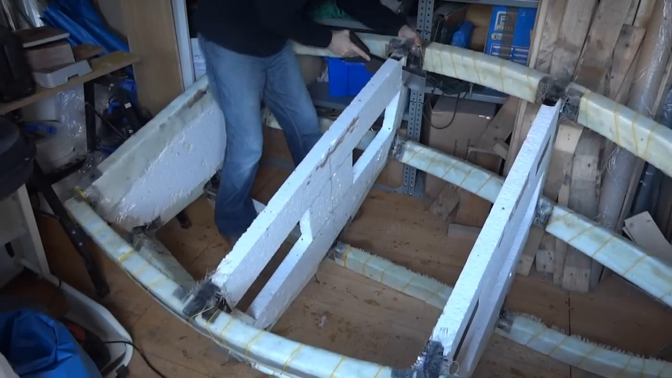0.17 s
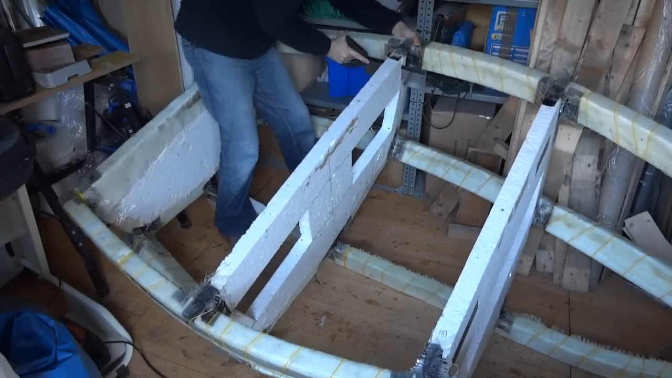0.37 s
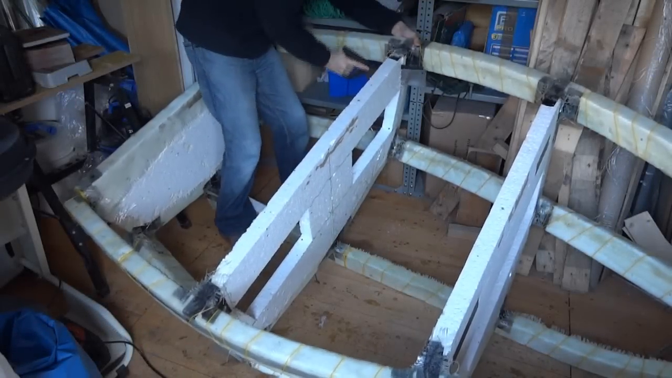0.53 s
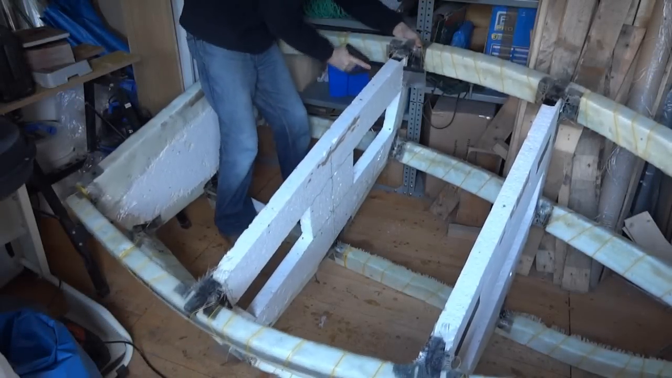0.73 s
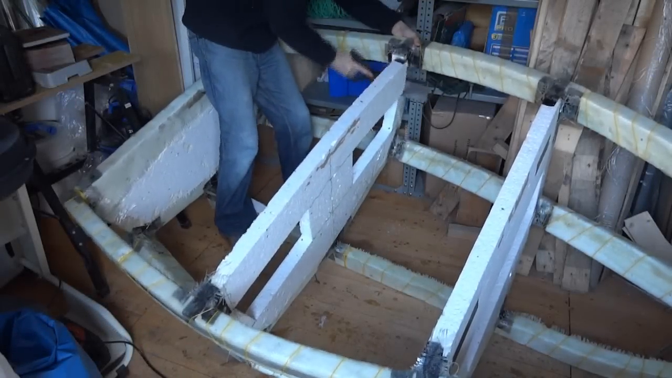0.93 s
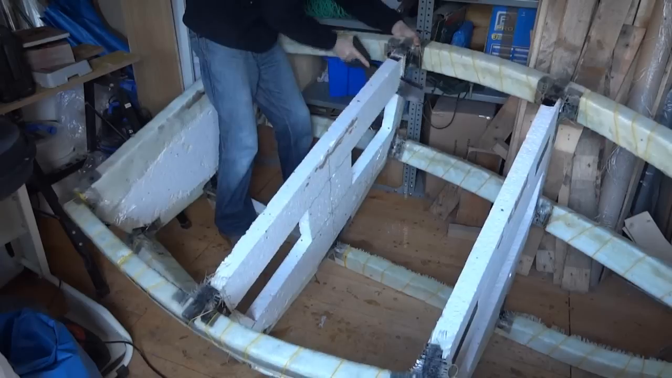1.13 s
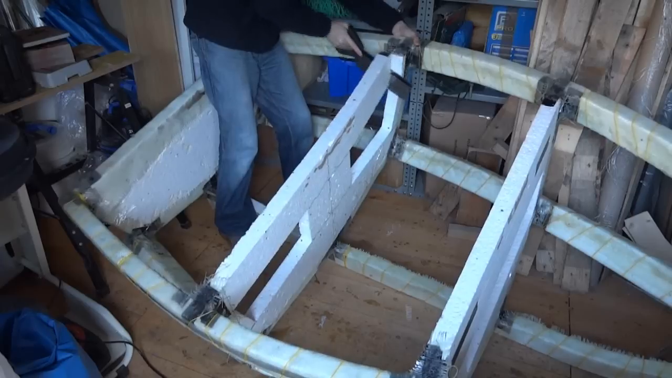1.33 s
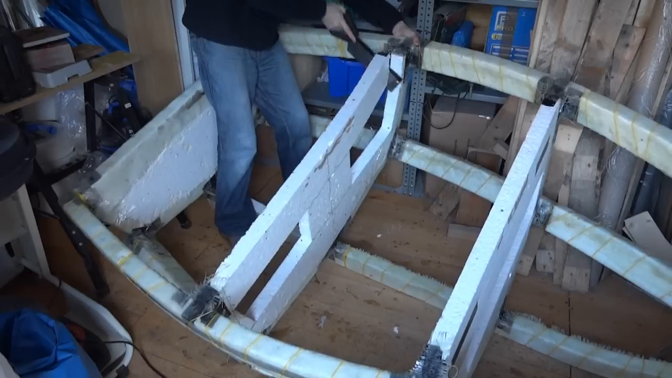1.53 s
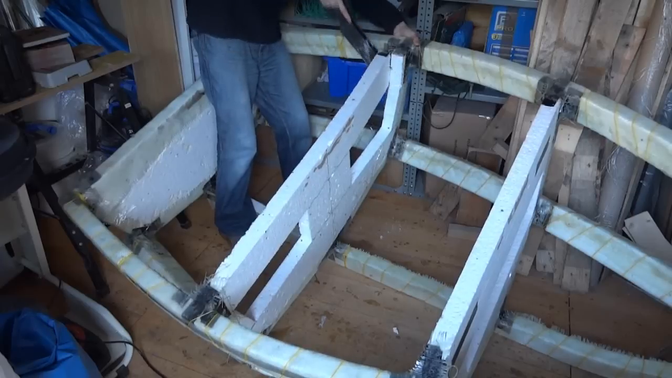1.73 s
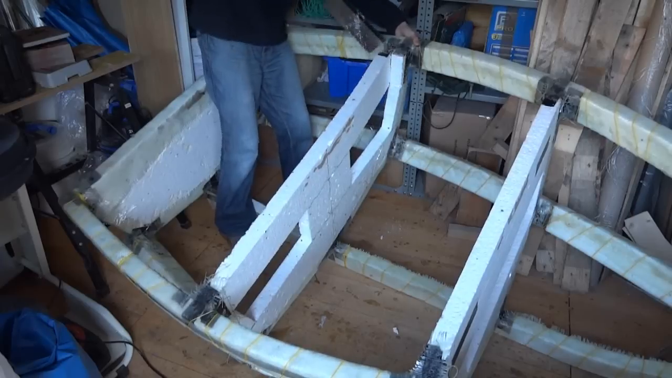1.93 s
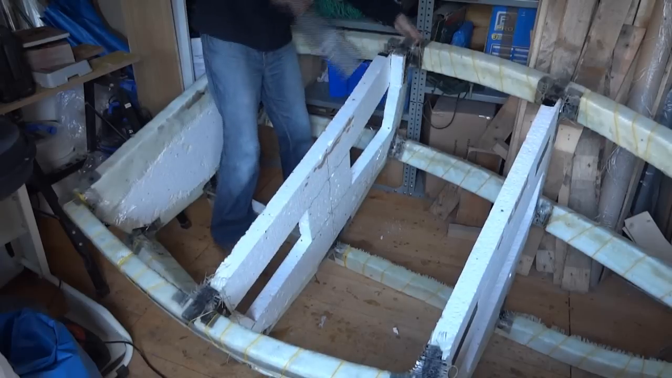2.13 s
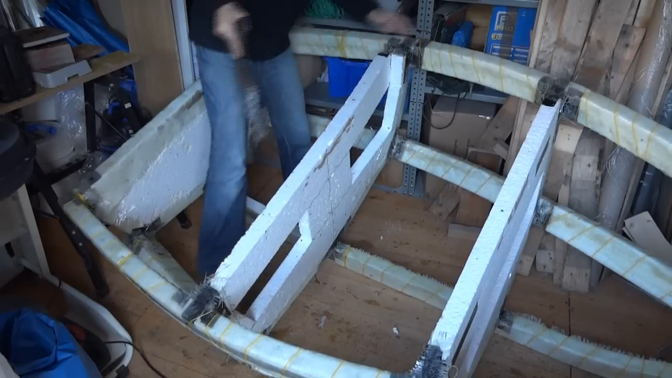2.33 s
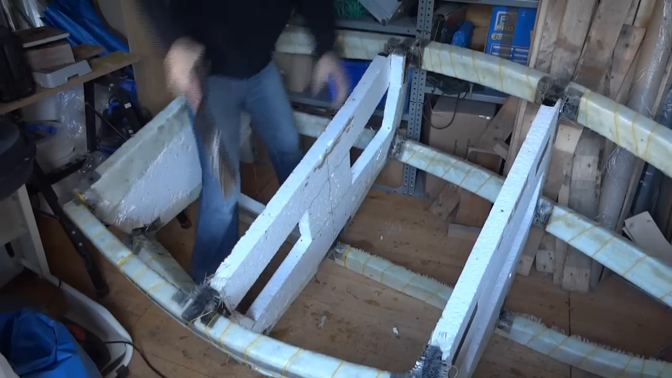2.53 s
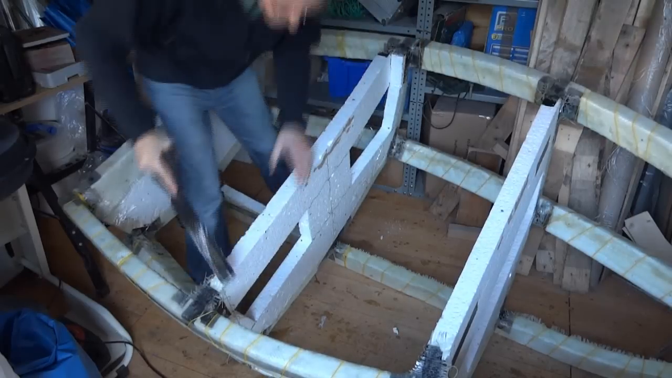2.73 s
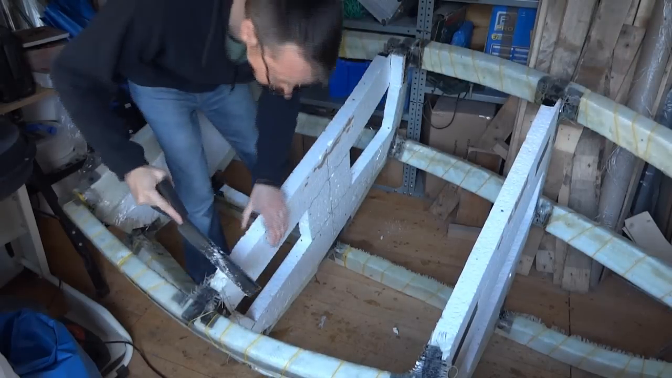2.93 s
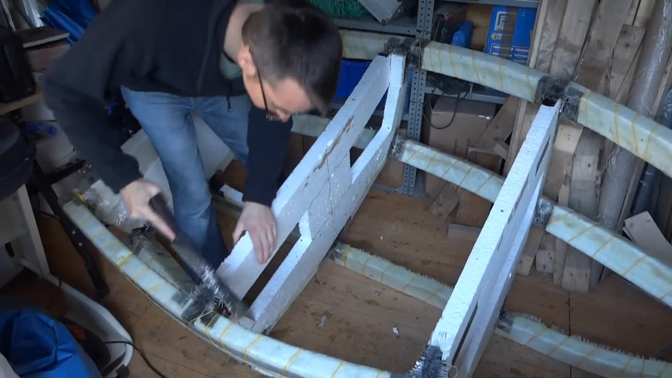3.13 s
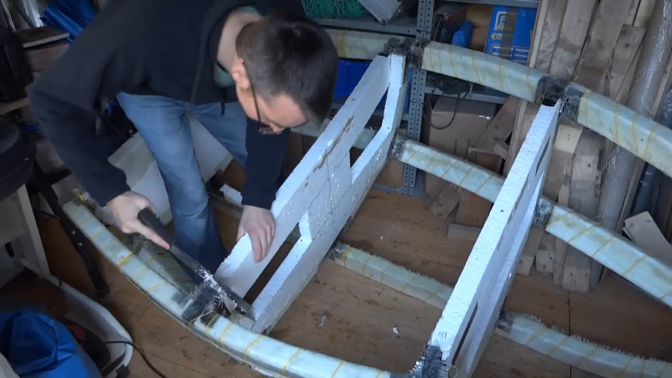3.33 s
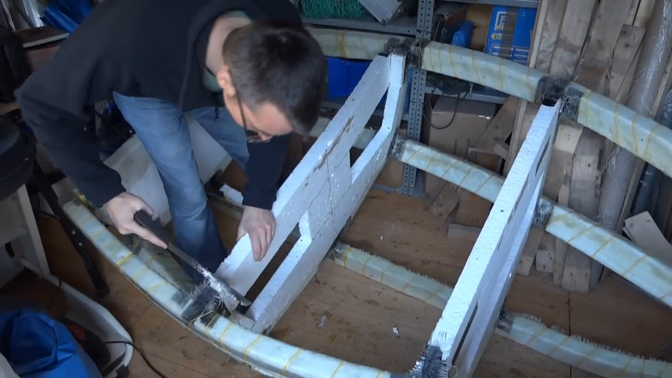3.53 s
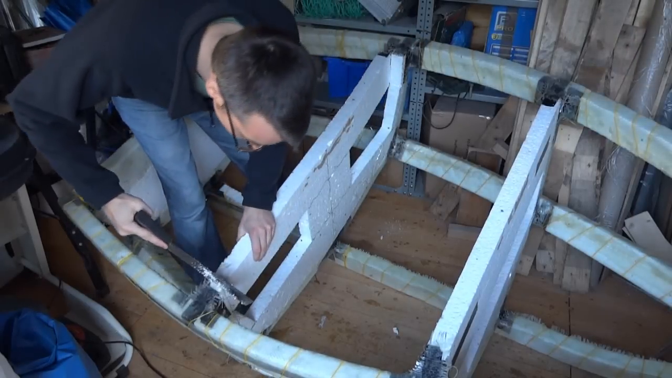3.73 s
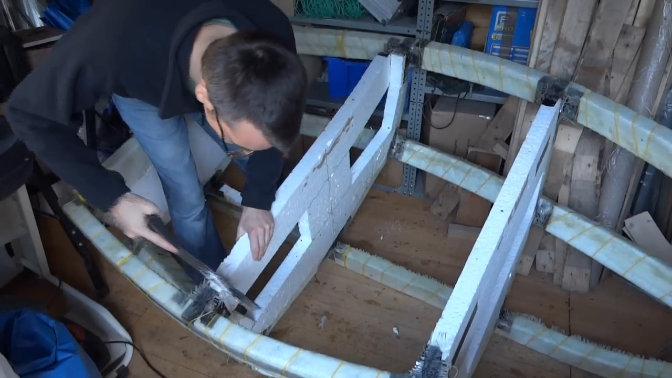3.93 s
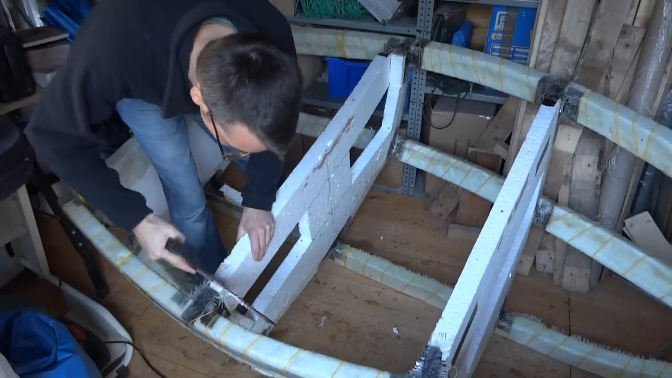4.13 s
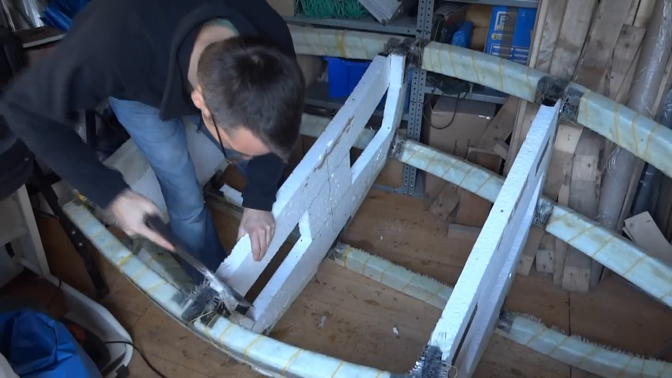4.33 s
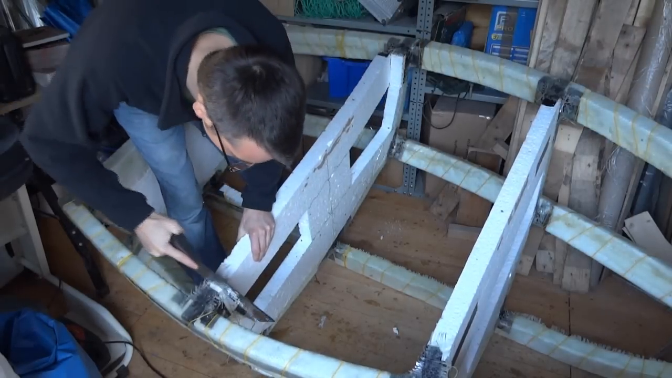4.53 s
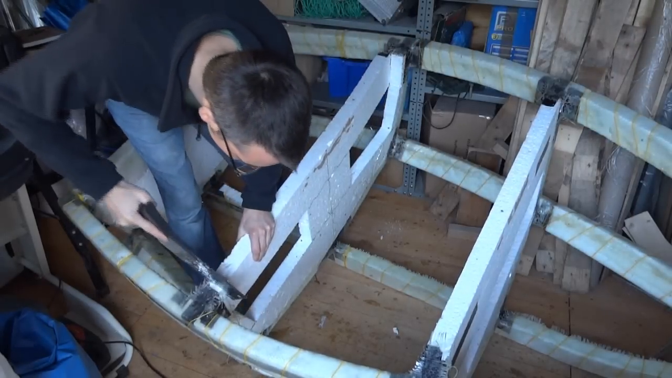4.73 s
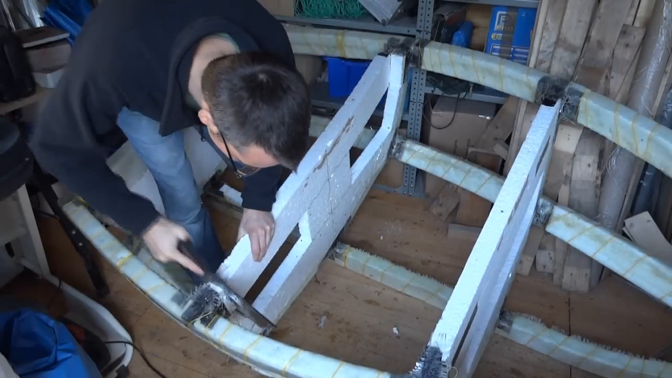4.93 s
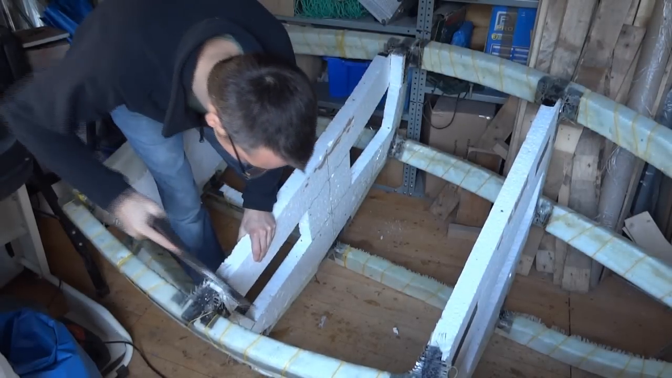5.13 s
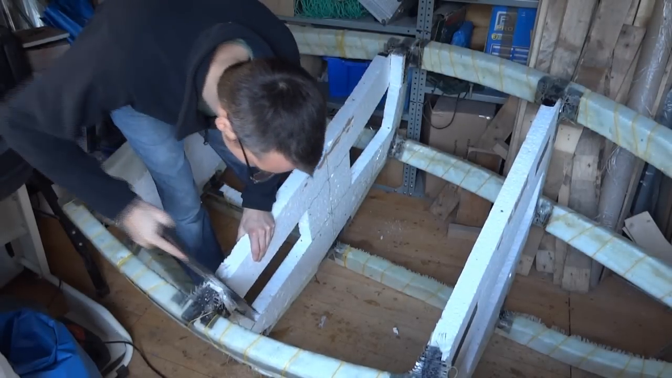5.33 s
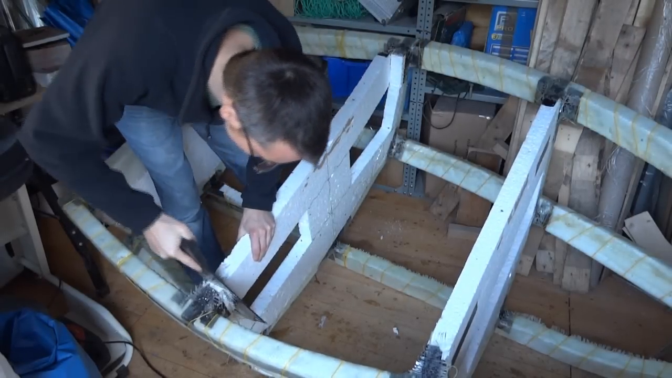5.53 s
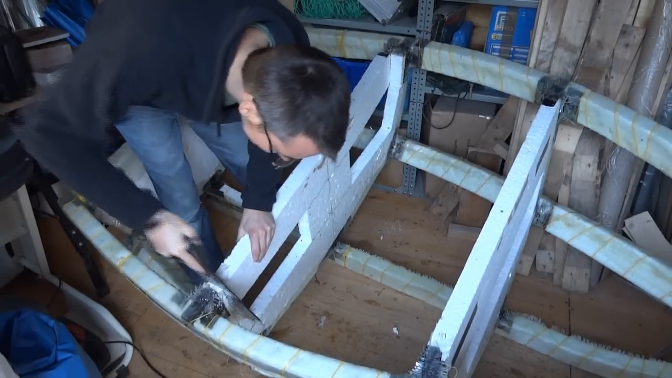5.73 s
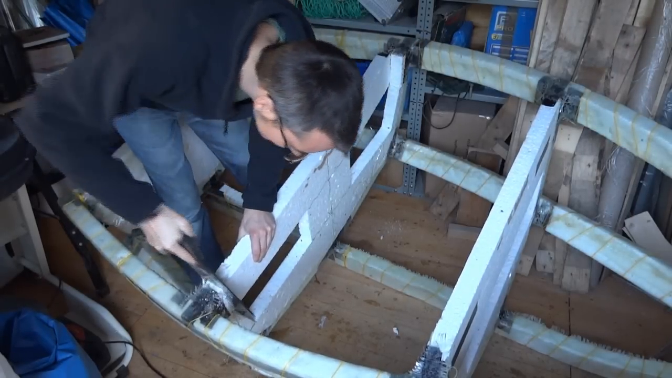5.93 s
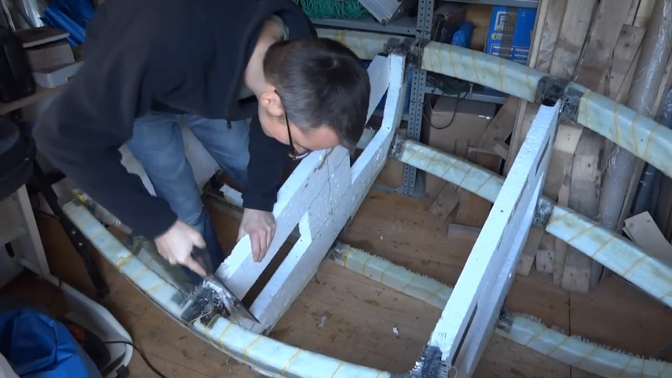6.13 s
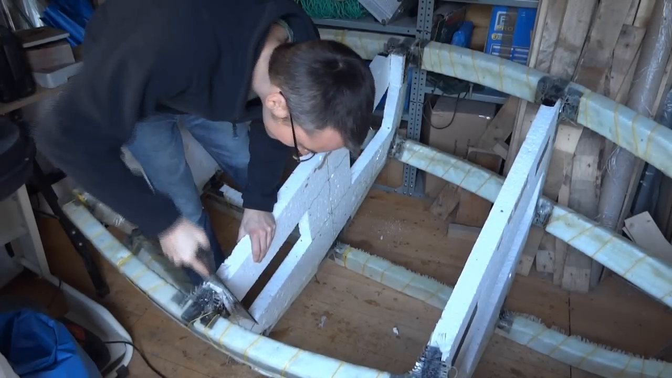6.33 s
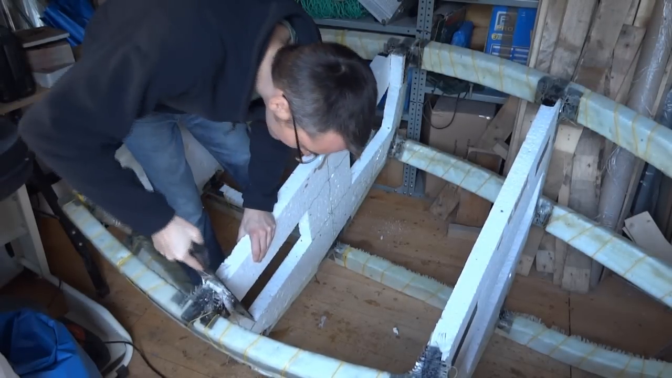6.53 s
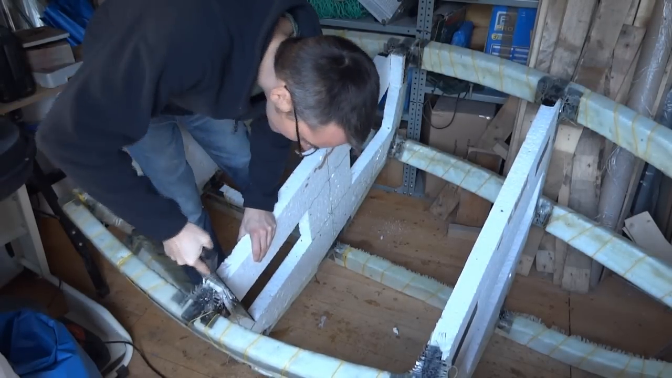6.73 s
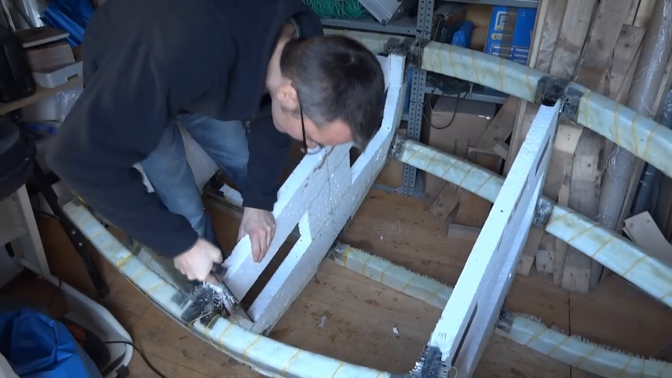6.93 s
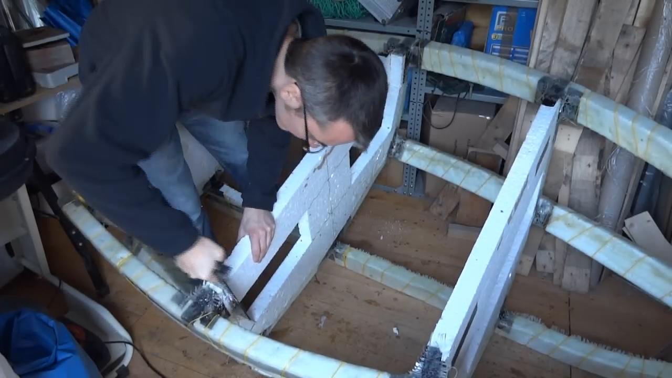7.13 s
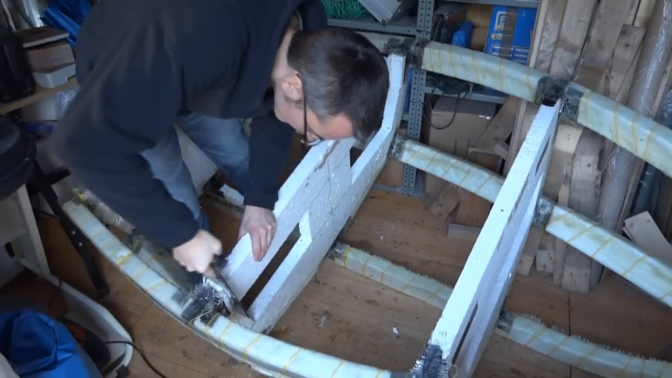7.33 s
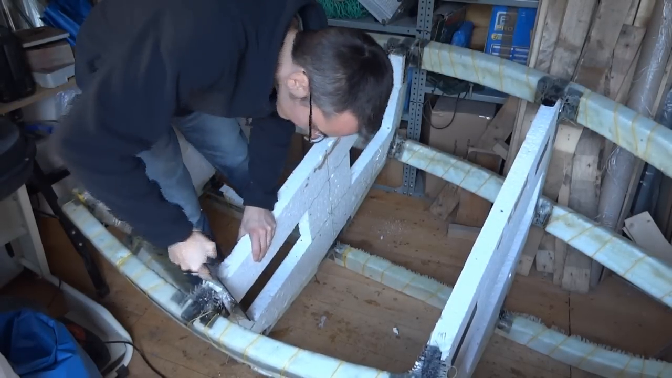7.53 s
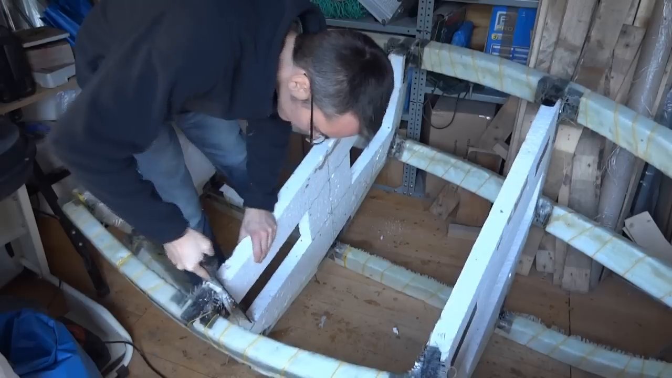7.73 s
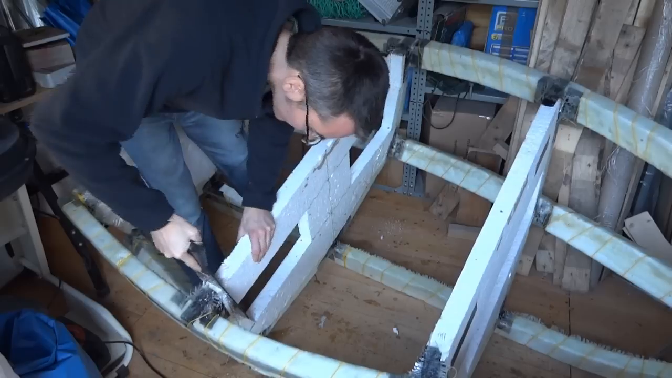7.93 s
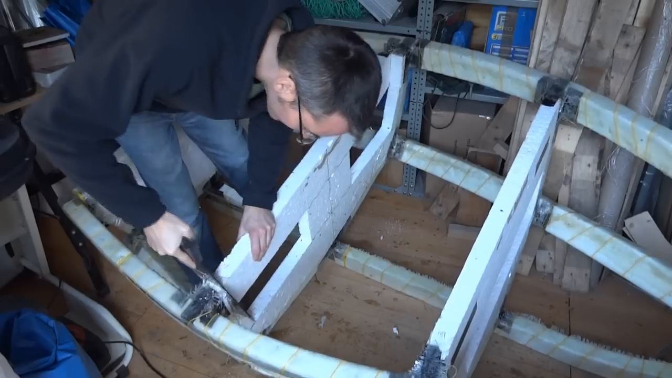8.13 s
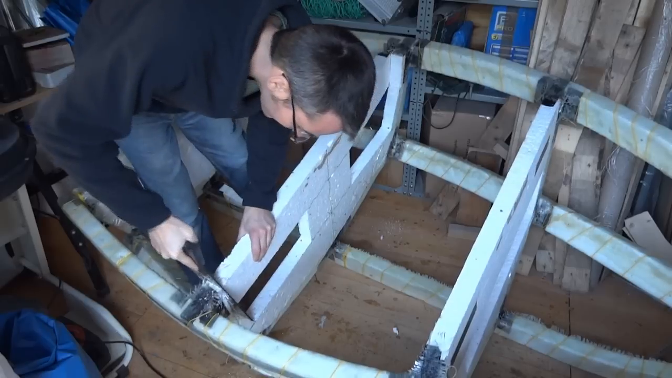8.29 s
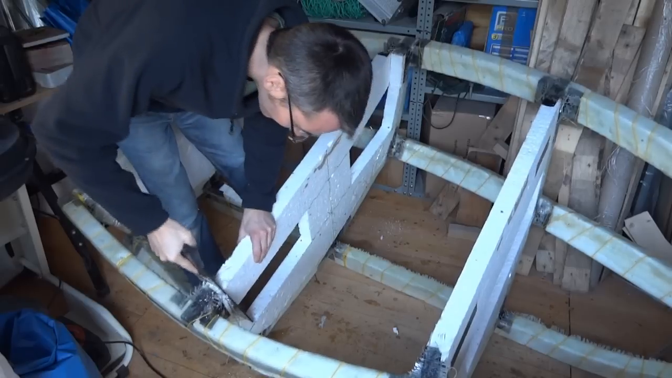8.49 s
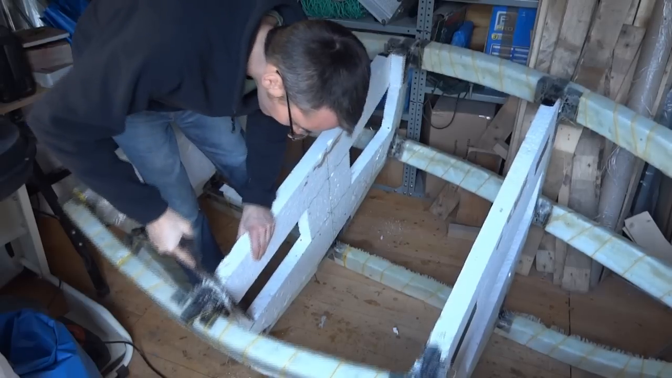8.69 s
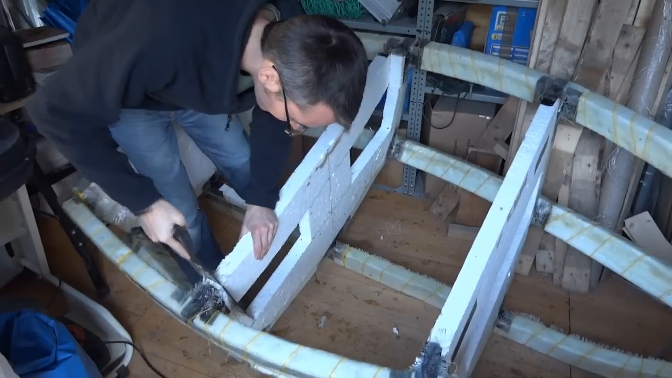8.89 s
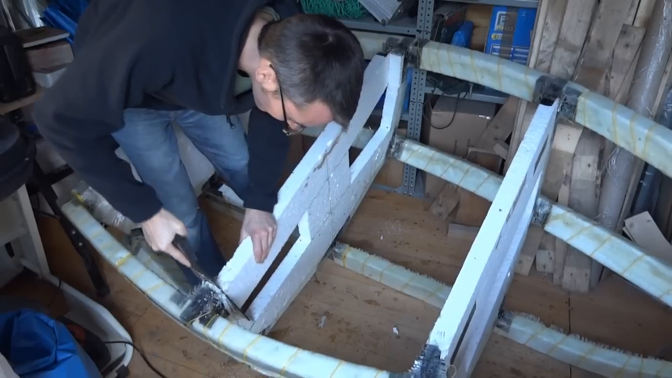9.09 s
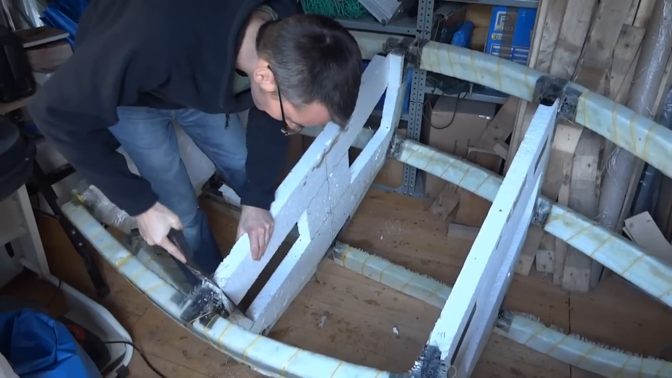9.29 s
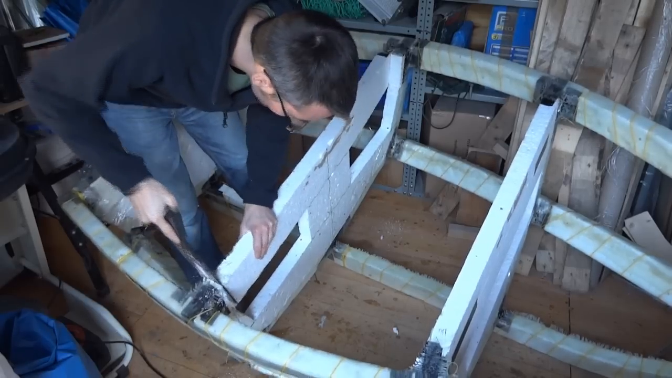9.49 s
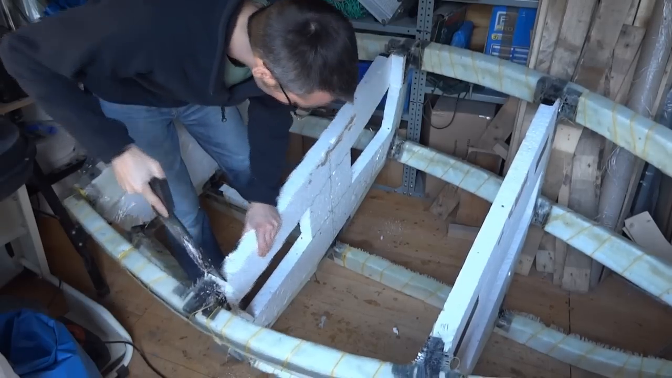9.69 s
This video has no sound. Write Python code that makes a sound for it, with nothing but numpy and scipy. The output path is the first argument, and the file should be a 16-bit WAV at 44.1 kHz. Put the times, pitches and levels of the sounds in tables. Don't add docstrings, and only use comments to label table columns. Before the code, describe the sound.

A close, nearly mono perspective in a small dry workshop with very quiet air. From 0 to 1.8 s a hand saw cuts polystyrene foam: soft hesitant rasps at first, then from 0.4 s loud, dense, bright crackle of tearing beads in uneven strokes. At about 1.6 to 1.8 s the blade draws out with a rough high squeal around 5 to 6 kHz, the low body thinning away. From 1.9 to 3.9 s it is almost quiet: a small dry tick, two dull steps near 2.0 and 2.45, cloth rustle, a brush at 2.8, then light steel chatters on foam at 3.5 to 3.9. At 3.97 sawing resumes, irregular until 5.8, then steady rapid push-pull rasps, about seven per second, alternately fuller and fizzier, with brief squeaks, chirps and hollow panel drumming. Strokes weaken after 9.45 s but continue to the end.

```python
import sys
import numpy as np
from scipy import signal
from scipy.fft import rfft, irfft, next_fast_len
from scipy.io import wavfile
from scipy.ndimage import uniform_filter1d

SR = 44100
rng = np.random.default_rng(int(sys.argv[2]) if len(sys.argv) > 2 else 0)


def level_to_linear(level):
    exponent = np.asarray(level, float) / 20
    return 10 ** exponent


def master_out(mix):
    frames = np.transpose(np.atleast_2d(mix))
    ceiling = np.clip(frames, -1, 1)
    pcm = np.round(ceiling * 32767).astype(np.int16)
    wavfile.write(sys.argv[1], SR, pcm)


N = 429975
PADDED = next_fast_len(N)


def rms_one(x):
    return x / np.sqrt(np.mean(x ** 2) + 1e-20)


def bins_hz():
    return np.fft.rfftfreq(PADDED, 1 / SR)


def at_hz(points, hz):
    point_hz, point_db = np.transpose(points)
    return np.interp(np.log(hz), np.log(point_hz), point_db)


def shaped(x, spectrum):
    gain = level_to_linear(at_hz(spectrum, np.maximum(bins_hz(), 10)))
    return irfft(rfft(x, PADDED) * gain, PADDED)[..., :N]


def drift(hz, size=N):
    r = np.exp(-8 * np.pi * hz / SR)
    white = rng.standard_normal(size // 4 + 1002)
    slow = signal.lfilter([1], [1, -2 * r, r * r], white)[1000:]
    return np.interp(np.arange(size) / 4, np.arange(len(slow)), rms_one(slow))


def resonance(x, hz, width_hz):
    r = np.exp(-np.pi * width_hz / SR)
    feedback = [1, -2 * r * np.cos(2 * np.pi * hz / SR), r * r]
    return signal.lfilter(np.array([1, 0, -1]) * (1 - r * r) / 2, feedback, x)


def slip_tone(hz, unsteady_hz, octave_db):
    phase = 2 * np.pi * np.cumsum(hz) / SR
    wander = .85 + drift(unsteady_hz, size=len(hz)) + 1j * drift(unsteady_hz, size=len(hz))
    swing = wander * np.exp(1j * phase)
    octave = swing ** 2 / (np.abs(swing) + 0.11)
    return rms_one(swing.real + level_to_linear(octave_db) * octave.real)


def air():
    # hz, level_db
    air_spectrum = [(15, -40), (25, -12), (92, 5), (236, -4), (863, -10.5), (936, -14), (3250, -38),
                    (4610, -30.5), (10700, -36.5), (16000, -32.5)]
    return level_to_linear(-54.5) * rms_one(shaped(rng.standard_normal((2, N)), air_spectrum))


def whine():
    return level_to_linear(-76) * rms_one(resonance(rng.standard_normal(N), hz=4600, width_hz=65))


def contact():
    # catch_s, rise_s, hold_s, level_db, weight_db
    far_cut = [(-.04, 0.038, 0.045, -26, 1.5), (.09, 0.009, 0.0058, -30, 5.5),
               (.138, 0.0053, 0.0073, -30.5, 5), (.21, .02, 0.099, -44.5, 2),
               (.311, 0.0083, 0.031, -19.5, 4), (.363, 0.095, 0.18, -15.5, 3),
               (.687, 0.019, 0.032, -25, 2.5), (.782, 0.056, 0.21, -13.5, -2),
               (1.091, 0.034, 0.18, -14, 0.5), (1.321, 0.025, 0.074, -16, 0.5),
               (1.42, 0.031, 0.14, -14, 0.5), (1.57, 0.029, 0.06, -17.5, 2.5),
               (1.676, 0.02, 0.11, -26.5, 3)]
    # start_s, rise_s, hold_s, level_db, weight_db
    steps = [(2.006, 0.0022, 0.025, -48, -3.5), (2.04, .01, 0.025, -56.5, 6),
             (2.152, 0.0071, 0.077, -63, -17), (3.28, .01, .02, -53, -6), (2.438, 0.011, 0.051, -46.5, 8),
             (2.483, 0.008, 0.1, -45.5, 7.5), (2.949, 0.027, 0.021, -56, 3), (3.2, 0.0034, 0.044, -51, -2),
             (3.325, 0.0039, .004, -49, -5), (3.347, 0.0018, 0.027, -48, -4.5)]
    # start_s, rise_s, hold_s, level_db, weight_db
    brushes = [(1.904, .002, 0.0107, -50, -10), (1.975, .015, .01, -56, -5), (2.765, 0.056, 0.025, -36, 3),
               (3.516, 0.0026, 0.018, -40, 2), (3.597, 0.0024, 0.021, -35, 8.5),
               (3.787, 0.0028, 0.0085, -33.5, -4), (3.869, .004, .02, -35.5, 6),
               (3.885, .003, .012, -38.5, -11), (3.91, .005, 0.022, -39.5, -10)]
    # catch_s, rise_s, hold_s, level_db, weight_db
    opening = [(3.969, 0.0036, 0.18, -14.5, 2), (4.264, 0.0015, 0.024, -20.5, 12.5),
               (4.311, 0.03, 0.056, -15, 6), (4.422, 0.023, 0.15, -14.5, 4.5),
               (4.635, 0.021, 0.038, -15.5, -8), (4.73, 0.011, 0.053, -19, -9.5),
               (4.84, 0.0017, 0.15, -16, 3), (5.05, 0.025, 0.011, -17.5, -2),
               (5.103, 0.0033, 0.031, -17.5, 0.5), (5.222, 0.01, .008, -21, -7),
               (5.296, 0.0022, 0.023, -21.5, -4), (5.359, 0.044, 0.076, -16, -2),
               (5.553, 0.035, 0.026, -20.5, -1.5), (5.632, 0.00095, 0.01, -15.5, 5.5),
               (5.72, 0.013, 0.028, -25.5, -5.5), (5.76, 0.0013, 0.074, -15.5, -1)]
    # catch_s, rise_s, hold_s, level_db, weight_db
    pushes = [(6.05, 0.035, 0.055, -15.5, 2.5), (6.349, 0.025, 0.034, -14, 0),
              (6.608, 0.01, 0.013, -21.5, 2), (6.645, 0.01, 0.024, -13.5, -2.5),
              (6.88, 0.062, 0.033, -16, -3.5), (7.18, 0.033, 0.026, -15, -5),
              (7.444, 0.028, 0.082, -15.5, -0.5), (7.717, 0.0014, 0.057, -15, 1),
              (7.954, 0.027, 0.073, -15, 2), (8.21, 0.024, 0.065, -15, 1),
              (8.453, 0.026, 0.081, -15.5, 4.5), (8.725, 0.0014, 0.088, -16, 3.5),
              (9.021, 0.011, 0.088, -15.5, 4), (9.3, 0.024, 0.025, -19, -0.5), (9.5, 0.022, 0.1, -21, -6)]
    # catch_s, rise_s, hold_s, level_db, weight_db
    pulls = [(5.875, 0.056, 0.072, -17, 1.5), (6.175, 0.067, 0.027, -14, -0.5),
             (6.466, 0.026, 0.082, -17, 1.5), (6.745, 0.024, 0.086, -16, 3.5),
             (7.044, 0.016, 0.042, -13, -3), (7.302, 0.0013, 0.021, -14.5, 5),
             (7.365, 0.011, 0.031, -17, 6), (7.536, 0.053, 0.079, -18, 3.5),
             (7.816, 0.029, 0.057, -16.5, 3.5), (8.098, 0.022, 0.036, -16, 8),
             (8.333, 0.016, 0.062, -15.5, 1), (8.604, 0.019, 0.031, -16, 5), (8.882, .004, 0.088, -15.5, 8),
             (9.158, 0.017, 0.074, -16, 3.5), (9.416, 0.002, .012, -21, 2), (9.425, 0.014, 0.021, -12, 0.5),
             (9.644, 0.05, 0.098, -22.5, 2.5)]
    kinds = [
        (far_cut, dict(rise_db=14, swell_db=2, release_db_per_s=271.5,
                       drum_db=-8, body_db=-4, fizz_db=4.5, brighten_db=1.4)),
        (steps, dict(rise_db=20.5, swell_db=-10, release_db_per_s=126,
                     drum_db=13, body_db=9, fizz_db=4.5, brighten_db=-2)),
        (brushes, dict(rise_db=16.5, swell_db=-3.5, release_db_per_s=284,
                       drum_db=14, body_db=10, fizz_db=-1.5, brighten_db=-3)),
        (opening, dict(rise_db=12.5, swell_db=1.1, release_db_per_s=240,
                       drum_db=-7.5, body_db=3, fizz_db=-0.5, brighten_db=2)),
        (pushes, dict(rise_db=14.5, swell_db=0.5, release_db_per_s=227,
                      drum_db=-4, body_db=0.9, fizz_db=1.4, brighten_db=-3.5)),
        (pulls, dict(rise_db=18.5, swell_db=4, release_db_per_s=217,
                     drum_db=-9, body_db=-1, fizz_db=7, brighten_db=-0.5))]
    drum_per_weight, body_per_weight, fizz_per_weight = 0.54, 0.53, -0.92
    body_per_brighten, fizz_per_lack = -0.3, -0.046
    s = np.arange(0, N / SR, 1e-3)
    power = np.full(len(s), level_to_linear(2 * -62.5))
    drum, body, fizz = power * 16, power * 8, power * -4.5
    for rows, way in kinds:
        for catch_s, rise_s, hold_s, level_db, weight_db in rows:
            rise_s, hold_s = max(rise_s, 1e-3), max(hold_s, 1e-3)
            full_s = catch_s + rise_s
            through = np.clip((s - full_s) / hold_s, 0, 1) - .5
            lack_db = way["rise_db"] * np.maximum(full_s - s, 0) / rise_s
            lack_db = lack_db + way["release_db_per_s"] * np.maximum(s - full_s - hold_s, 0)
            stroke = level_to_linear(2 * (level_db + way["swell_db"] * through - np.minimum(lack_db, 200)))
            brighten_db = way["brighten_db"] * through
            power += stroke
            drum += stroke * (way["drum_db"] + drum_per_weight * weight_db)
            body += stroke * (way["body_db"] + body_per_weight * weight_db + body_per_brighten * brighten_db)
            fizz += stroke * (way["fizz_db"] + fizz_per_weight * weight_db + brighten_db
                              + fizz_per_lack * np.minimum(lack_db, 20))
    return s, np.sqrt(power), drum / power, body / power, fizz / power


def chirrups(teeth):
    out = np.zeros(N)
    for hz in np.geomspace(640, 12000, 20):
        flare = np.maximum(drift(22) - .8, 0)
        out += flare * resonance(teeth, hz, 50 + .02 * hz)
    return out


def flexing(x):
    _, _, z = signal.stft(x, nperseg=512)
    field = uniform_filter1d(rng.standard_normal(z.shape), size=5, axis=0)
    field = uniform_filter1d(field, size=4, axis=1)
    mottle_db = 1.8 * rms_one(field)
    return signal.istft(z * level_to_linear(mottle_db), nperseg=512)[1][:N]


def tearing():
    # hz, db_per_hz
    tear_spectrum = [(18, -51), (30, -17.5), (117, -12), (148, -5.5), (231, -2), (469, -5), (793, -3.5),
                     (928, -3), (4020, -1), (4580, -2.5), (13400, -5.5), (15700, -11.5)]
    # hz, width_hz, level_db
    panel_modes = [(153.5, 12, 4), (230, 30, 3), (352, 63, 2), (580, 30, 1.5), (800, 25, -1),
                   (1993, 120, -9.5)]
    # time_s, level_db
    frame_rumble = [(.7, -2), (.9, -3), (1.4, 17), (1.5, 0), (3.5, 9), (7.4, 7), (7.5, 15)]
    # time_s, lowest_hz
    draw_out = [(1.4, 201), (1.412, 1500), (1.46, 2500), (1.575, 3100), (1.6, 4300), (1.655, 4820),
                (1.677, 350), (1.698, 5000), (1.795, 5620), (1.81, 200)]
    # time_s, spread_s, hz, level_db
    patches = [(0.03, 0.025, 240, -8), (0.08, 0.1, 950, 9), (0.13, 0.029, 236, 14), (0.14, 0.054, 3060, -9),
               (0.58, 0.025, 300, -17), (0.59, 0.034, 3120, 5.5), (1.01, 0.06, 15320, -4.5),
               (1.02, 0.16, 4770, 1.5), (1.12, 0.16, 150, -10), (1.32, 0.1, 1920, -4), (1.34, 0.05, 377, 8),
               (1.45, 0.055, 7660, 5), (1.53, 0.07, 15320, -7), (1.61, 0.14, 760, 4.5),
               (1.67, 0.079, 2410, -12), (1.89, 0.17, 120.4, -7), (3.225, .025, 4800, 7.5),
               (4.22, 0.028, 240, 15), (4.29, 0.035, 1930, -7.5), (4.29, 0.06, 12160, 7),
               (4.53, 0.03, 150, -17), (4.55, 0.029, 6000, 5.5), (4.62, 0.088, 15320, -4.5),
               (4.75, 0.076, 300, 9), (4.75, 0.28, 764, -1.5), (4.88, 0.036, 3040, 6.5),
               (5.02, 0.036, 380, 14), (5.06, 0.11, 15320, 2), (5.093, 0.0086, 2590, -5),
               (5.2, 0.037, 243, 15), (5.52, 0.034, 239, 17), (5.58, 0.22, 15320, 2), (5.869, 0.026, 240, 12),
               (6.05, 0.022, 766, 9), (6.06, 0.16, 15320, 2.5), (6.08, 0.043, 190, -10),
               (6.31, 0.03, 477, 12), (6.32, 0.022, 1220, 16.5), (6.59, 0.028, 3830, -6),
               (6.79, 0.026, 240, -10), (7.07, 0.04, 15320, -8.5), (7.17, 0.04, 190, 12),
               (7.39, 0.019, 15320, 5), (7.55, 0.085, 302, 6), (7.84, 0.016, 240, 12),
               (7.99, 0.044, 2430, -2), (8.1, 0.048, 150, -7), (8.62, 0.18, 4830, 3.5),
               (8.74, 0.018, 150, -12), (9.22, 0.054, 480, 9.5), (9.42, 0.134, 149, -9),
               (9.43, 0.03, 15320, -13)]
    t = np.arange(N) / SR
    s, pressure, drum_db, body_db, fizz_db = contact()

    burst_size = level_to_linear(2.7 * np.minimum(rng.exponential(1, N), 5))
    bursts = (rng.random(N) < 6000 / SR) * burst_size * rng.choice([-1, 1], N)
    teeth = rms_one(bursts) * 0.63 + rng.standard_normal(N) * 0.73
    teeth = teeth * level_to_linear(0.92 * drift(211) - 1.5) * np.interp(t, s, pressure)
    teeth = teeth + chirrups(teeth)+ sum(level_to_linear(db) * resonance(teeth, hz, width_hz)
                                         for hz, width_hz, db in panel_modes)

    hz = np.maximum(bins_hz(), 10)
    colour = level_to_linear(at_hz(tear_spectrum, hz))
    spectrum = rfft(teeth, PADDED) * colour
    draw_s, draw_hz = np.transpose(draw_out)
    lowest_hz = np.exp(np.interp(s, draw_s, np.log(draw_hz)))
    rumble_db = drum_db + np.interp(s, *np.transpose(frame_rumble))
    patch_s, spread_s, patch_hz, patch_size_db = np.transpose(patches)
    swells = np.exp(-.5 * ((s[:, None] - patch_s) / np.maximum(spread_s, .01)) ** 2)
    anchors = np.log([60, 250, 1000, 3700, 10500, 16000])
    out, bright_power = np.zeros(N), 0 * s
    for centre_hz in 30 * 4 ** (np.arange(15) / 3):
        octaves = np.log2(hz / centre_hz)
        share = np.cos(np.pi * np.clip(.75 * octaves, -.5, .5)) ** 2
        weights = [np.interp(np.log(centre_hz), anchors, one) for one in np.eye(6)]
        tilt_db = np.dot(weights, [rumble_db, drum_db, body_db, 0 * s, fizz_db, 1.28 * fizz_db])
        loss = np.clip(0.32 + 0.69 * np.log2(lowest_hz / max(centre_hz, 300)), 0, 1)
        tilt_db = tilt_db - 12.5 * loss * (0.84 if centre_hz < 600 else 1)
        gain = level_to_linear(tilt_db)
        bright_power += np.mean(share * (hz > 1000) * colour ** 2) * gain ** 2
        near = np.exp(-.5 * (np.log2(centre_hz / patch_hz) / .45) ** 2)
        gain = np.interp(t, s, gain * level_to_linear(swells @ (patch_size_db * near)))
        flicker = level_to_linear(1.1 * drift(16))
        out += gain * flicker * irfft(spectrum * share, PADDED)[:N]
    return flexing(out) / np.interp(t, s, np.sqrt(bright_power))


def squeaks():
    # start_s, length_s, first_hz, last_hz,
    # level_db
    slips = [(1.382, 0.029, 10400, 10250, -21), (4.258, 0.026, 1025, 1300, -28),
             (5.494, 0.049, 1700, 1370, -26.5), (5.058, 0.028, 1600, 1635, -27),
             (5.058, .025, 3200, 3300, -31), (5.082, .03, 5350, 5560, -24),
             (5.085, .045, 10900, 11400, -25), (5.843, 0.044, 1305, 1190, -28),
             (5.927, .055, 5950, 5540, -27.5), (6.203, 0.048, 7150, 7300, -26.5),
             (6.237, 0.038, 4350, 4340, -21), (6.772, 0.039, 3420, 3570, -24),
             (6.801, 0.038, 4080, 4100, -24), (6.975, 0.051, 1445, 1340, -29.5),
             (7.059, 0.048, 815, 794, -29), (7.094, 0.035, 1730, 1590, -29),
             (7.1, 0.034, 4040, 4000, -20.5), (7.219, 0.08, 2550, 2480, -32),
             (7.23, 0.074, 5220, 5210, -27.5), (7.616, 0.037, 3900, 3950, -21),
             (7.648, 0.04, 13950, 13900, -24), (7.883, 0.071, 1628, 1614, -23.5),
             (7.982, 0.024, 2635, 2740, -22.5), (7.991, 0.043, 1365, 1360, -23),
             (8.034, 0.051, 2660, 2590, -25), (8.04, 0.058, 1310, 1388, -24.5),
             (8.144, 0.056, 3960, 3860, -21.5), (8.24, .041, 5010, 5090, -23),
             (8.266, 0.037, 2600, 2655, -22.5), (8.292, 0.058, 1377, 1420, -27),
             (8.365, 0.073, 4030, 4110, -19.5), (8.905, 0.061, 3450, 3380, -24),
             (9.096, 0.04, 1920, 1810, -24), (9.572, 0.042, 8390, 8420, -28),
             (9.694, 0.06, 9500, 9630, -26), (9.715, 0.038, 4280, 4580, -27),
             (9.718, 0.042, 2350, 2220, -26),
             (0.312, 0.14, 840, 682, -37), (1.025, 0.038, 2030, 2160, -35),
              (1.041, 0.046, 13280, 13200, -34), (1.123, 0.065, 1150, 1190, -32),
              (1.367, 0.038, 14920, 14920, -26), (1.579, 0.035, 10000, 11400, -22),
              (1.571, 0.092, 8600, 8600, -26), (4.06, 0.043, 5800, 5900, -37),
              (4.44, 0.04, 3370, 3280, -23), (5.053, 0.034, 2090, 2080, -26),
              (5.055, 0.027, 1080, 1060, -27), (5.103, 0.041, 1590, 1710, -28),
              (5.381, 0.054, 2280, 2290, -27), (5.59, 0.032, 9990, 9990, -31.5),
              (6.156, 0.041, 770, 920, -34), (6.223, 0.039, 5410, 5490, -27), (6.49, 0.06, 7700, 7820, -28),
              (6.664, 0.041, 7120, 7220, -27), (6.783, 0.035, 7090, 7160, -29),
              (6.797, 0.022, 5820, 5710, -28), (6.956, 0.029, 5920, 5920, -24),
              (7.049, 0.035, 4700, 4700, -32), (7.496, 0.024, 3900, 3870, -26),
              (7.712, 0.042, 5530, 5230, -26), (7.755, 0.064, 1360, 1360, -29.5),
              (7.764, 0.046, 5340, 5250, -27), (8.015, 0.045, 800, 820, -28),
              (8.133, 0.038, 3470, 3700, -22), (8.944, 0.039, 2330, 2373, -24.5),
              (9.31, 0.054, 9850, 9930, -34), (9.325, 0.049, 6670, 6620, -28), (9.43, 0.04, 800, 800, -31),
              (9.451, 0.052, 7320, 7300, -29), (9.459, 0.041, 9960, 9950, -27),
             (6.485, .045, 3800, 4050, -21), (6.52, .07, 4150, 4280, -22), (6.495, .04, 3400, 3450, -27),
                (6.235, .07, 3320, 3320, -32), (1.47, .075, 3660, 3640, -23), (0, .08, 220, 220, -43),
                (.44, .1, 215, 200, -37), (2.5, .11, 220, 210, -40), (.91, .07, 190, 250, -31),
                (1.1, .05, 160, 160, -32), (1.2, .08, 390, 385, -35), (1.25, .05, 250, 170, -37),
                (1.34, .07, 240, 200, -34), (1.665, .04, 400, 360, -36), (1.8, .05, 220, 250, -41),
                (7.5, .07, 250, 200, -30), (7.78, .08, 255, 200, -30), (9.045, .05, 375, 365, -28),
                (1.5, .09, 3200, 3050, -31), (1.752, .052, 6300, 6300, -19), (1.848, .016, 9200, 9200, -39),
                (2.772, .09, 230, 240, -36), (3.925, .029, 3050, 3150, -46), (4.33, .08, 350, 340, -27),
                (4.87, .11, 345, 340, -28.5), (7.86, .065, 8000, 9300, -29), (8.57, .064, 220, 250, -28),
                (8.885, .07, 245, 205, -19.5), (9.05, .145, 156, 150, -22.5), (9.165, .04, 3500, 4000, -24)]
    out = np.zeros(N)
    for start_s, length_s, first_hz, last_hz, level_db in slips:
        start, size = int(start_s * SR), int(length_s * SR)
        glide_hz = np.linspace(first_hz, last_hz, size)
        tone = slip_tone(glide_hz, 22 + .018 * first_hz, octave_db=-13)
        tone = level_to_linear(level_db + 2.0) * tone * signal.windows.tukey(size, .6)
        out[start:start + size] += tone[:N - start]
    return out


def workshop(x):
    t60_s = 0.11
    t = np.arange(int(.35 * SR)) / SR
    tails = rng.standard_normal((2, len(t))) * level_to_linear(-60 * t / t60_s) * (t > .003)
    tails = signal.lfilter([1, -1], [1, -.99], tails)
    dull = signal.lfilter([.5], [1, -.5], tails)
    tails = tails * np.exp(-t / 0.038) + dull
    tails = tails / np.sqrt(np.sum(tails ** 2, axis=1, keepdims=True))
    return signal.fftconvolve(x[None], tails, axes=1)[:, :N]


def squeal():
    # time_s, pitch_hz, level_db
    squeal_path = [(1.58, 5200, -29.5), (1.605, 5450, -23), (1.645, 6050, -22.5), (1.675, 5015, -23),
                   (1.702, 5240, -21), (1.73, 5455, -21), (1.765, 5490, -24), (1.8, 5440, -33.5),
                   (1.85, 5630, -42)]
    s, pitch_hz, level_db = np.transpose(squeal_path)
    t = np.arange(s[0], s[-1], 1 / SR)
    tone = slip_tone(np.interp(t, s, pitch_hz), 350., octave_db=-5)
    out, start = np.zeros(N), int(s[0] * SR)
    level = level_to_linear(np.interp(t, s, level_db) + 6.5)
    out[start:start + len(t)] = level * tone * signal.windows.tukey(len(t), .1)
    return out


def touches():
    # time_s, tick_db, ring_db
    touch_events = [(1.911, -31.5, -22), (2.0114, -35.5, -19), (2.1095, -52, -30), (2.1589, -54, -30),
                    (2.2157, -50, -29.5), (2.6062, -44, -30), (2.9301, -53, -32), (2.9575, -47, -30),
                    (2.4422, -50, -8), (2.483, -28.5, -15), (2.7974, -49, -7), (3.2054, -50, -10),
                    (3.347, -41, -20), (3.5168, -38.5, 1), (3.6038, -33, -4), (3.7942, -30.5, 4),
                    (3.8783, -45, 2)]
    # hz, level_db, t60_s
    blade_modes = [(570, -27, .1), (1300, -1.5, 0.046), (2040, -6.5, 0.069), (2900, -3.5, 0.027),
                   (4430, -2.5, 0.021), (7020, -6, 0.03)]
    tick_s, chatter_s = .0008, .012
    time_s, tick_db, ring_db = np.transpose(touch_events)
    at = (time_s * SR).astype(int)
    ticks, blows = np.zeros(N), np.zeros(N)
    ticks[at] = level_to_linear(tick_db + 16.5)
    blows[at] = level_to_linear(tick_db + ring_db)
    crumble = rng.standard_normal(128) * np.exp(-np.arange(128) / (tick_s * SR))
    ticks = np.convolve(ticks, crumble / np.linalg.norm(crumble))[:N]
    out = signal.lfilter([1, -1], [1, -.6], ticks)
    chatter = rng.standard_normal(2048) * np.exp(-np.arange(2048) / (chatter_s * SR))
    blows = signal.fftconvolve(blows, 2 * chatter / np.linalg.norm(chatter))[:N]
    for hz, level_db, t60_s in blade_modes:
        r, w = level_to_linear(-60 / (t60_s * SR)), 2 * np.pi * hz / SR
        ring = signal.lfilter([0, np.sin(w)], [1, -2 * r * np.cos(w), r * r], blows + 1e-18)
        out += level_to_linear(level_db) * ring
    return out


def scene():
    # hz, side_minus_mid_db
    width_spectrum = [(60, -23), (110, -28.5), (200, -35.5), (380, -27), (700, -21.5), (1290, -21),
                      (2380, -21), (4400, -18), (8120, -18), (15000, -19)]
    saw = tearing() + squeaks() + squeal() + touches()
    wet_mid, wet_side = workshop(saw)
    air_mid, air_side = air()
    high = signal.butter(2, 900, "high", fs=SR, output="sos")
    wet_mid = signal.sosfilt(high, wet_mid)
    mid = saw + level_to_linear(-11.5) * wet_mid + air_mid + whine()
    side = level_to_linear(0.5) * shaped(wet_side + air_side, width_spectrum)
    return np.array([mid + side, mid - side])


def roll_off(x):
    return signal.sosfilt(signal.butter(12, 16730, fs=SR, output="sos"), x)


def record(dry):
    cutoff_hz, slope_hz = 15770, 80
    soft = 0.71 * np.tanh(dry / 0.71)
    soft = signal.sosfilt(signal.butter(3, 40, "high", fs=SR, output="sos"), soft)
    keep = np.clip((cutoff_hz - bins_hz()) / slope_hz, 0, 1)
    mix = irfft(rfft(soft, PADDED) * keep, PADDED)[:, :N]
    return roll_off(mix)


dry = scene()
out = record(dry)
master_out(out)
```